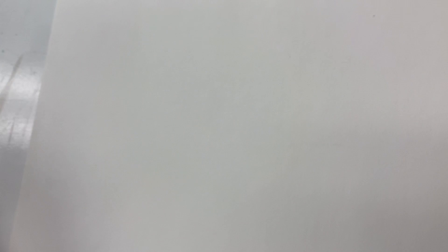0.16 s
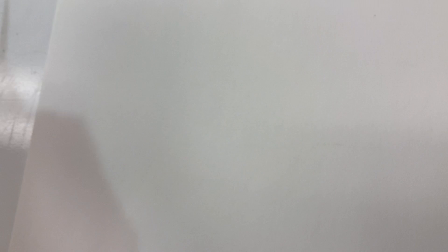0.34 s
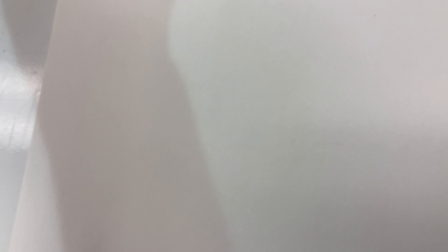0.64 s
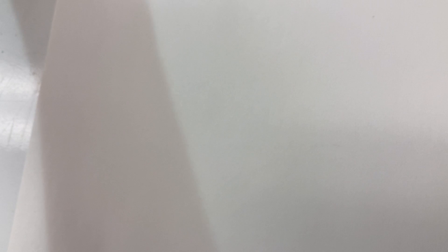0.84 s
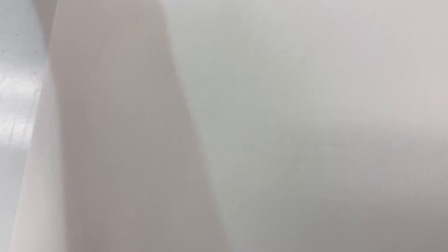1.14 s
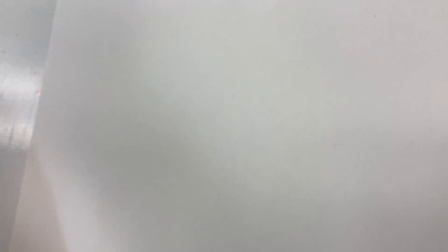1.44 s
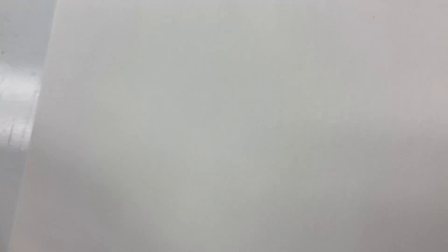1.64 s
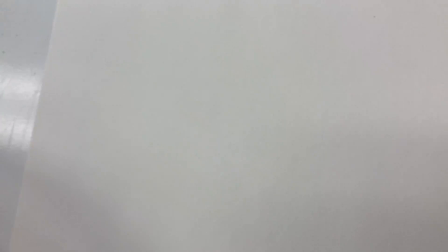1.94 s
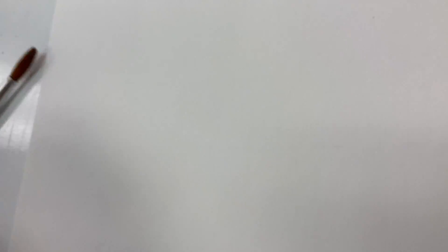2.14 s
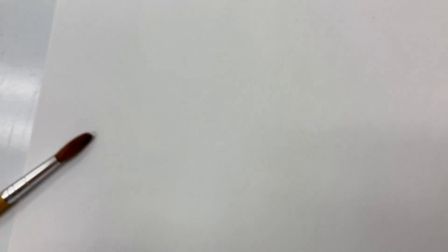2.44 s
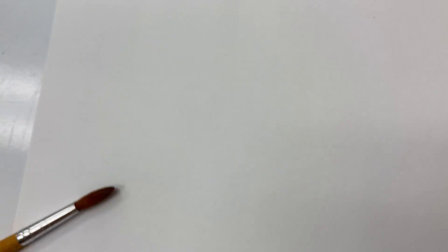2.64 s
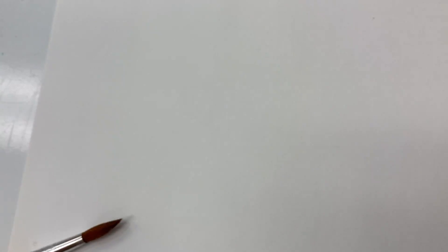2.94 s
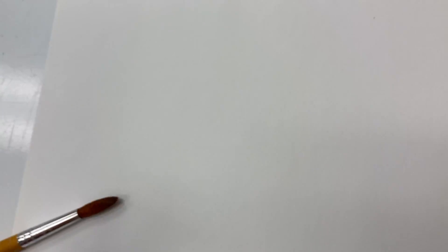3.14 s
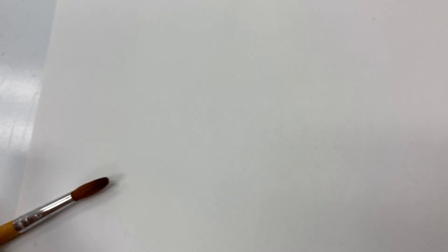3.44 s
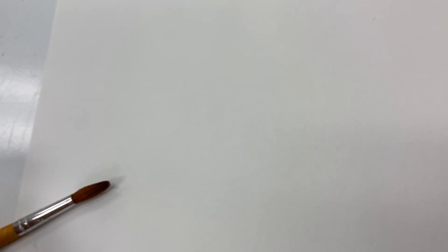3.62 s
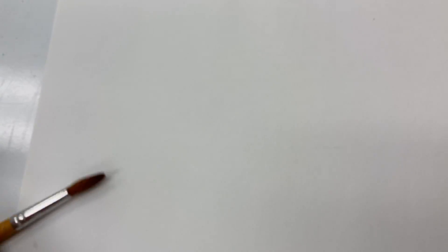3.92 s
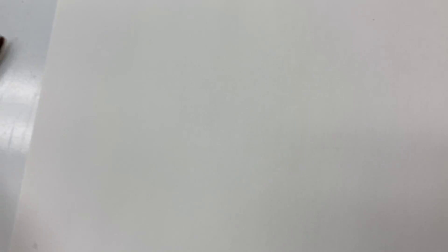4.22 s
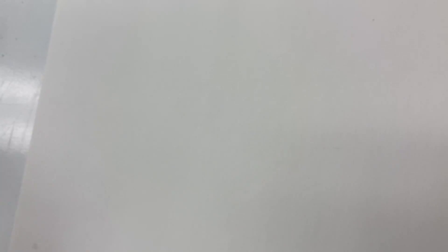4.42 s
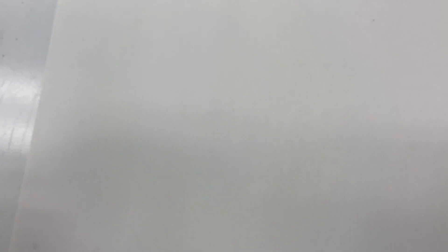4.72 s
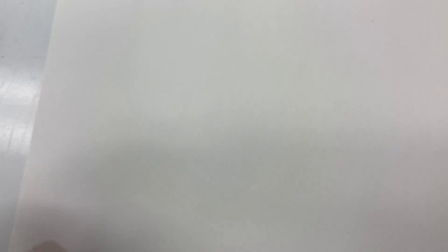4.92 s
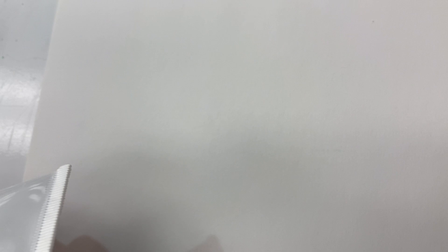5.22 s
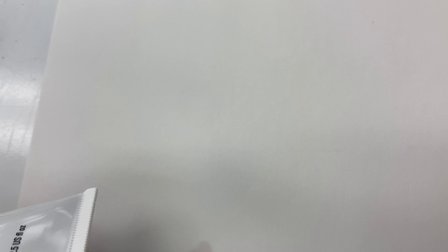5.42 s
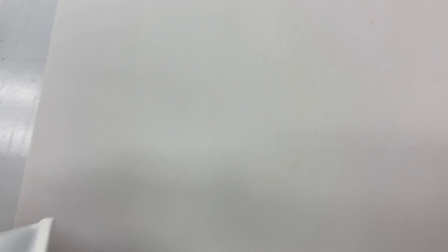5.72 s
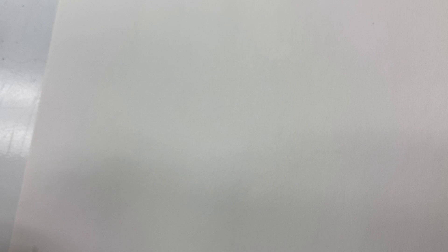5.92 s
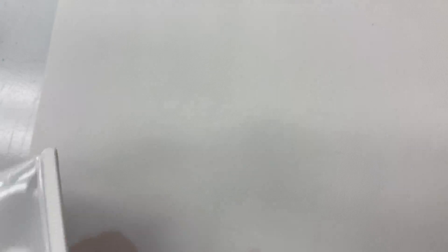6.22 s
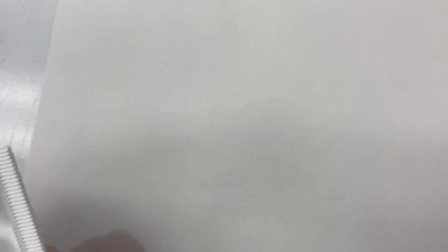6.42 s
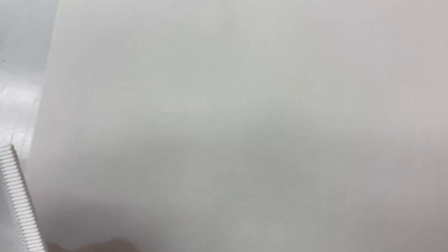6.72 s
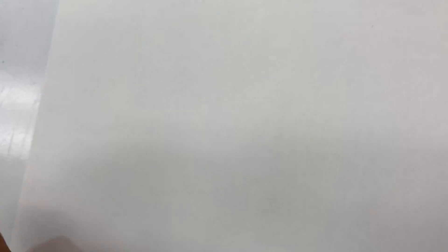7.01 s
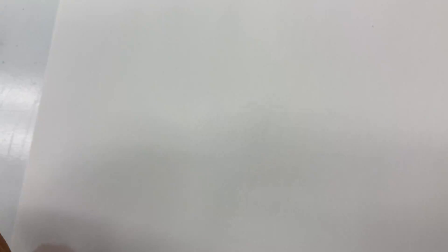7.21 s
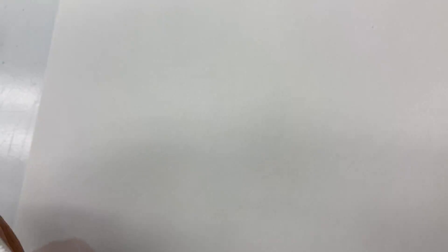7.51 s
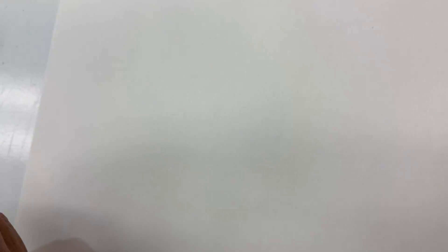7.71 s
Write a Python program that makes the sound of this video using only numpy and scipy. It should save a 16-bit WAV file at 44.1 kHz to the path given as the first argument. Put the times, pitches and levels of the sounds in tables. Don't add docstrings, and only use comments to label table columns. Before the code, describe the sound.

Close paper rustles, rubbing and small knocks on a thin board build to sharp snaps, then fade to quiet tube crinkles and ventilation hum.

```python
import sys
import numpy as np
from scipy import signal
from scipy.fft import rfft, irfft, next_fast_len
from scipy.io import wavfile
from scipy.ndimage import uniform_filter1d, map_coordinates

SR = 44100
rng = np.random.default_rng(int(sys.argv[2]) if len(sys.argv) > 2 else 0)


def pcm_store(signal):
    levels = np.round(np.clip(np.atleast_2d(signal), -1, 1) * 32767)
    wavfile.write(sys.argv[1], SR, levels.astype(np.int16).T)


def elevation(decibels):
    levels = np.asarray(decibels, float)
    return 10 ** (levels / 20)


N = 346626


def unit(x):
    return x / np.sqrt(np.mean(x ** 2) + 1e-20)


def along(points, hz):
    f, v = np.transpose(points)
    return np.interp(np.log(hz + 1), np.log(f + 1), v)


def from_grid(step_s, values):
    return np.interp(np.arange(N) / SR, np.arange(0, N / SR, step_s), values)


def wobble(rate_hz):
    knots = rng.standard_normal(int(N * rate_hz / SR) + 4)
    return map_coordinates(knots, [np.arange(N) * rate_hz / SR])


def filtered(x, response):
    n = x.shape[-1]
    m = next_fast_len(n + 2048)
    return irfft(rfft(x, m) * response(np.fft.rfftfreq(m, 1 / SR)), m)[..., :n]


def colour(points):
    return lambda hz: elevation(along(points, hz))


def resonances(modes):
    def response(f):
        total = 0
        for k, (hz, width_hz, db) in enumerate(modes):
            damping = 1j * f * width_hz
            total = total + (-1) ** k * elevation(db) * damping / (hz * hz - f * f + damping)
        return total
    return response


def spread(pair, alike):
    def mid_side(hz):
        angle = np.arccos(np.clip(along(alike, hz), -1, 1)) / 2
        return np.array([np.cos(angle), np.sin(angle)])
    mid, side = filtered(pair, mid_side)
    return np.array([mid + side, mid - side])


def grit(rate_hz, rough_db, patchy_db):
    z = signal.stft(rng.standard_normal((2, N)), nperseg=256)[2]
    field = uniform_filter1d(rng.standard_normal(z.shape[1:]), size=4, axis=0)
    field = uniform_filter1d(field, size=14, axis=1)
    pair = signal.istft(z * elevation(patchy_db * unit(field)), nperseg=256)[1][:, :N]
    return pair * elevation(rough_db * wobble(rate_hz))


def settle(t, start_s, db, t60_s):
    return elevation(db - 60 * np.abs(t - start_s) / t60_s) * (t >= start_s)


def swell(t, start_s, top_s, end_s, db):
    rise_fall = np.interp(t, [start_s, top_s, end_s], [0, 1, 0])
    return elevation(db) * np.sin(np.pi / 2 * rise_fall) ** 1.6


# start_s, level_db, t60_s, scrape_over_rumble_db
SKIDS = [(0.113, -52.5, 0.38, 2), (1.118, -57.5, 0.41, -6.5), (1.278, -64, 0.56, 7),
         (1.819, -43, 0.28, -23), (3.486, -42, 0.77, -7), (3.715, -40.5, 0.33, -11), (3.777, -34, 0.21, -2),
         (4.31, -38.5, 0.1, 2), (4.32, -46, 0.64, 0), (4.494, -53, 0.21, 2.5), (4.54, -64, 0.26, -7),
         (5.333, -81, 1, 0), (5.691, -60, 0.2, -10)]
# start_s, hardest_s, end_s, level_db, scrape_over_rumble_db
DRAGS = [(-.15, .0, 0.22, -48.5, -2), (0.174, 0.253, 0.39, -66, -1.5), (0.318, 0.372, 0.47, -69, 11),
         (1.27, 1.48, 1.707, -63.5, -1), (1.922, 2.052, 2.33, -52, -4), (2.15, 2.18, 2.306, -47.5, -2),
         (2.25, 2.44, 2.746, -51, -7.5), (2.602, 2.68, 2.9, -64, -5), (2.73, 2.948, 3.18, -73, -2),
         (3.778, 3.87, 4.25, -57, -8), (4.074, 4.138, 4.7, -60.5, -10), (4.4, 4.557, 4.68, -64.5, -0.5),
         (4.142, 4.29, 4.49, -52.5, 1.5), (5.002, 5.023, 5.1, -84, -8), (5.882, 5.93, 5.99, -69, -1),
         (6.12, 6.172, 6.22, -82, -20), (7.193, 7.27, 7.65, -76, -19), (7.46, 7.5, 7.55, -74, -13)]


def board_gains():
    t = np.arange(0, N / SR, .001)
    rumble, scrape = np.zeros((2, len(t)))
    for start_s, db, t60_s, scrape_db in SKIDS:
        rumble += settle(t, start_s, db, t60_s)
        scrape += settle(t, start_s, db + scrape_db, t60_s / 1.9)
    for start_s, top_s, end_s, db, scrape_db in DRAGS:
        push = swell(t, start_s, top_s, end_s, db)
        rumble += push
        scrape += push * elevation(scrape_db)
    return [from_grid(.001, g) for g in (rumble, scrape)]


# start_s, hiss_db, t60_s, rustle_over_hiss_db, airy_over_hiss_db
FLICKS = [(.1, -47, 0.12, -20, -1.5), (.152, -54, 0.12, -9.5, 1), (1.119, -57.5, 0.05, -2, -12),
          (1.278, -66, .25, -11.5, -25), (2.156, -53, .06, 6.5, -3.5), (2.175, -80, 0.33, 24, -13),
          (2.258, -64, 0.14, 5.5, -10), (2.614, -50, 0.26, -14, -0.5), (2.69, -68.5, 0.3, 6.5, -19),
          (3.486, -52.5, 0.31, -1, -1), (3.715, -58, 0.39, -9, -5), (3.7746, -28, .05, -4.5, 0),
          (3.785, -48.5, 0.26, 6, -6.5), (4.27, -48, .04, -15, 2), (4.307, -37, 0.11, 2, -8),
          (4.34, -50, 0.67, 0, -14.5), (4.487, -53.5, 0.28, -4, -2), (4.54, -89, 0.38, 1.5, -13),
          (5.333, -76, 0.97, 0, -1), (5.392, -64, .06, -3, -3), (5.51, -68, .1, -3, -1),
          (5.69, -71, 0.4, 0, -1), (6.165, -91, 0.31, 8, 7.5)]
# start_s, fastest_s, end_s, hiss_db, brightness_db
SLIDES = [(-.1, 0.07, 0.17, -60.5, -1.5), (-.1, .03, 0.28, -77.5, -14), (0.085, 0.11, 0.122, -48, -2),
          (.18, 0.217, 0.43, -75.5, -3), (0.335, 0.36, 0.46, -68.5, -3.5), (1.29, 1.453, 1.6, -70, -10.5),
          (1.815, 1.836, 1.98, -65.5, -7.5), (1.983, 1.993, 2.03, -58, 6), (1.985, 2.035, 2.062, -52, 7),
          (2.06, 2.12, 2.16, -72, -3), (1.877, 2.035, 2.123, -59.5, -9), (2.71, 2.76, 2.8, -72, -4),
          (2.96, 3.01, 3.24, -85, -6), (3.053, 3.143, 3.2, -84, 12.5), (3.794, 3.897, 4.3, -66.5, -7),
          (4.11, 4.128, 4.4, -63.5, -6), (4.5, 4.58, 4.68, -72, -7.5), (4.2, 4.251, 4.3, -67.5, -14),
          (5.062, 5.132, 5.16, -77.5, 3), (5.201, 5.284, 5.9, -85, -5), (5.9, 5.946, 6.0, -86, 12),
          (6.001, 6.072, 6.12, -93, -14), (7.189, 7.247, 7.29, -84, -7.5), (7.46, 7.503, 7.57, -85, 0)]


def sheet_gains():
    t = np.arange(0, N / SR, .001)
    rustle, hiss, airy = np.zeros((3, len(t)))
    for start_s, db, t60_s, rustle_db, airy_db in FLICKS:
        rustle += settle(t, start_s, db + rustle_db, t60_s / 0.98)
        hiss += settle(t, start_s, db, t60_s)
        airy += settle(t, start_s, db + airy_db, t60_s / 1.2)
    for start_s, top_s, end_s, db, bright_db in SLIDES:
        slide = swell(t, start_s, top_s, end_s, db)
        rustle += slide * elevation(-7 - 0.96 * bright_db)
        hiss += slide
        airy += slide * elevation(bright_db)
    return [from_grid(.001, g) for g in (rustle, hiss, airy)]


# centre_hz, width_hz, level_db
RUBBED_MODES = [(230, 22, 3.5), (299.2, 120, -7.5), (394.1, 31, 2), (555, 160, -10.5)]
# centre_hz, width_hz, level_db
SCRAPED_MODES = [(621.6, 90, -5.5), (830, 220, -2), (1158, 77, 2), (1420, 60, -1.5), (1603, 50, -1.5),
                 (1878, 40, -1), (2139, 31, -2), (2694, 370, -14)]
# pitch_hz, density_db_per_hz
RUSTLE_BAND = [(1900, -18.5), (2400, -1), (3500, 0.5), (4300, -8), (5500, -12), (6500, -24.5)]
HISS_BAND = [(4000, -21.5), (5500, -3), (7000, -5), (8000, -0.5), (10000, -1.5), (11500, -25.5)]
AIRY_BAND = [(9500, -21), (11000, 4), (13000, -5), (15300, -4.5), (16200, -25.5)]


def strokes(rumble_gain, scrape_gain):
    rustle_gain, hiss_gain, airy_gain = sheet_gains()

    def scraped(hz):
        return resonances(SCRAPED_MODES)(hz) ** 1.1 / (1 + (hz / 3200) ** 4)

    rumble = unit(filtered(grit(40, rough_db=0.7, patchy_db=2.0), resonances(RUBBED_MODES)))
    scrape = unit(filtered(grit(70, rough_db=3.0, patchy_db=1.0), scraped))
    rustle = unit(filtered(grit(150, rough_db=0.5, patchy_db=3.0), colour(RUSTLE_BAND)))
    fine = grit(300, rough_db=1.5, patchy_db=3.0)
    hiss = unit(filtered(fine, colour(HISS_BAND)))
    airy = unit(filtered(fine, colour(AIRY_BAND)))
    board = rumble_gain * rumble + scrape_gain * scrape
    return board + rustle_gain * rustle + hiss_gain * hiss + airy_gain * airy


# centre_hz, width_hz, level_db
KNOCKED_MODES = [(135, 15, -11.5), (228, 20, -4.5), (282.5, 32, -2), (420, 30, -5.5), (609, 17, -7),
                 (825, 68, -5), (1048, 64, -5.5)]
# centre_hz, width_hz, level_db
TAPPED_MODES = [(706, 160, -7), (1190, 180, -1), (1530, 250, -1.5), (2145, 340, -4)]


def contact(out, start_s, db, knock_db, body_db, snap_hz, top_db,
            snap_t60_s=.019, body_t60_s=.069, dull_hz=np.inf):
    t = np.arange(SR // 6) / SR
    snap_noise, body_noise, ragged, top_noise = rng.standard_normal((4, 2, len(t)))

    rise = 1 - np.exp(-t * snap_hz / 1.9)
    snap_modes = [(snap_hz, 0.14 * snap_hz, 0), (1.7 * snap_hz, 1.3 * snap_hz, -9)]
    snap = filtered(snap_noise * elevation(-60 * t / snap_t60_s) * rise, resonances(snap_modes))

    top_modes = resonances([(11600, 2200, 0), (14200, 2500, -3)])
    top = filtered(top_noise * elevation(-60 * t / 0.0024), lambda f: top_modes(f) ** 2)

    body = filtered(body_noise * elevation(-60 * t / body_t60_s),
                    lambda f: resonances(TAPPED_MODES)(f) / (1 + 1j * f / dull_hz) ** 3)

    blow = (1 + 0.41 * ragged) * t * elevation(-60 * t / 0.0089)
    knock = filtered(blow, resonances(KNOCKED_MODES))

    start = round(start_s * SR)
    layers = [(-5.0, snap), (top_db + 0.5, top), (body_db + 1.0, body), (knock_db - 0.5, knock)]
    for layer_db, layer in layers:
        out[:, start:start + len(t)] += elevation(db + layer_db) * layer / np.abs(layer[0]).max()


# start_s, peak_db, knock_db, body_db, snap_hz
TAPS = [(.096, -24.5, -19, -6, 3050), (1.1195, -39, -22.5, -10, 3510), (1.278, -39.5, -4.5, -17, 3630),
        (1.654, -60, -6, -12, 2900), (1.82, -40, 0.5, -5.5, 3660), (2.077, -36.5, -7.5, -7.5, 2720),
        (2.156, -45, -32, 6.5, 3140), (2.259, -55, 2.5, 6.5, 3400), (2.689, -40.5, -20, -4.5, 2300),
        (3.799, -28, -9.5, -12, 3817), (4.211, -52, 0, -9.5, 2920), (4.237, -38, -10.5, -15.5, 3000),
        (4.304, -17.5, -21, -9.5, 4192), (4.3077, -12.5, -25, -17, 4210), (4.312, -18.5, -26, -12, 4390),
        (4.489, -27.5, -17.5, -16.5, 4194), (5.733, -43.5, -8.5, -15, 2700), (5.77, -48, -13, -13, 3500),
        (5.847, -60, -10, -20, 6500), (6.165, -48, -33.5, -20, 2900)]


def taps(out):
    for start_s, db, knock_db, body_db, snap_hz in TAPS:
        contact(out, start_s, db, knock_db, body_db, snap_hz, top_db=-20.5)


# start_s, peak_db, knock_db, body_db
THUDS = [(.754, -65.5, 9, -13), (1.833, -38, -10, -15.5), (1.91, -52, 4.5, -0.5), (3.484, -37, 9.5, 4),
         (3.715, -42, 9, 0), (3.74, -48, 2.5, -0.5), (4.087, -59.5, 10.5, -6), (4.121, -51.5, 15.5, 5.5),
         (4.142, -48.5, 3.5, -9), (5.692, -52, 12, -3), (7.805, -70, 2.5, -11)]


def thuds(out):
    for start_s, db, knock_db, body_db in THUDS:
        contact(out, start_s, db, knock_db, body_db, snap_hz=3070, top_db=-11,
                body_t60_s=0.21, dull_hz=900)


# start_s, peak_db, knock_db, top_db
CREASES = [(.014, -42, -25.5, -6), (.068, -43.5, -29.5, -12), (.155, -37, -6, -10),
           (2.15, -47.5, -30.5, -2), (2.171, -52, -30.5, -4), (2.217, -54, -28.5, -9),
           (2.273, -57, -30, -4), (2.284, -48.5, -30, -7), (1.2, -48, -22, -22), (1.3, -49, -29, -8),
           (1.471, -51, -29, -6), (1.503, -48, -29, -8), (1.988, -36, -39, -17), (2.615, -34.5, -33, 1),
           (2.641, -39.5, -26, -9), (2.69, -40, -10, -18), (2.825, -57, -8.5, -3), (2.842, -50, -18, -9),
           (3.502, -33.5, 1.5, -8), (3.7726, -10, -36, -9), (4.272, -28, -20, -8.5),
           (5.082, -51, -10, -19.5), (7.252, -57.5, 1, -18), (7.534, -59, -14, 2), (7.56, -66, -14, -1)]


def creases(out):
    for start_s, db, knock_db, top_db in CREASES:
        contact(out, start_s, db, knock_db, body_db=-20, snap_hz=7740, top_db=top_db)


# start_s, peak_db, top_db
CRINKLES = [(.342, -56, -9), (5.333, -38, -14), (5.354, -48, -10), (5.362, -37, -10), (5.384, -37, -7),
            (5.442, -50, -15), (5.475, -38.5, -10), (5.5, -39, -6), (5.59, -50, -7), (5.597, -54, -7),
            (5.72, -57, -8), (5.754, -52, -10), (5.918, -62, -5)]


def crinkles(out):
    for start_s, db, top_db in CRINKLES:
        contact(out, start_s, db, knock_db=-43, body_db=-19, snap_hz=5200, top_db=top_db, snap_t60_s=.014)


def contacts():
    out = np.zeros((2, N + SR))
    for source in (taps, thuds, creases, crinkles):
        source(out)
    return out[:, :N]


# start_s, pitch_hz,
# level_db, t60_s
RINGS = [(0.068, 301, -32.5, .03), (0.083, 231, -37.5, 0.11), (.096, 1470, -32.5, .04),
         (.096, 3120, -32.5, 0.023), (.153, 228, -41, 0.13), (1.118, 1130, -46, 0.054),
         (1.201, 3750, -63, .025), (1.201, 1250, -58, 0.055), (1.279, 1165, -45.5, 0.054),
         (1.278, 3660, -52, .02), (1.299, 3660, -52, .03), (1.336, 3600, -57, 0.025),
         (1.503, 4700, -56, .015), (1.821, 222, -33, 0.08), (1.834, 223.5, -33, 0.1),
         (2.077, 2070, -48, .04), (3.486, 264.4, -25, 0.12), (3.484, 131, -37.5, 0.2),
         (3.49, 786, -45, .15), (3.485, 1155, -44, .1), (3.485, 656, -43.5, 0.19), (3.509, 263.8, -30, .4),
         (3.503, 440, -46, .15), (3.716, 272, -33, 0.11), (3.715, 714, -41.5, 0.13),
         (3.74, 266, -40.5, 0.23), (3.7729, 7350, -22, .018), (3.773, 3790, -31, .05),
         (3.773, 2110, -35.5, 0.12), (3.775, 5750, -35, 0.03), (3.773, 1177, -36.5, 0.035),
         (3.772, 428, -36.5, 0.3), (3.797, 266.4, -35, 0.39), (3.797, 643.7, -39.5, 0.14),
         (4.121, 267, -32, 0.1), (4.12, 130, -45, 0.37), (4.121, 650, -44.5, 0.083), (4.144, 271, -35, 0.2),
         (4.306, 1120, -31, .1), (4.305, 1440, -37, 0.059), (4.305, 3600, -29, 0.072),
         (4.306, 4250, -24, 0.045), (4.304, 5500, -30, 0.064), (4.305, 420, -36, 0.1),
         (5.082, 8620, -53.5, 0.022), (5.362, 250, -51, .15), (5.734, 2765, -58, .012),
         (5.734, 653, -58, 0.048), (5.754, 751, -52, 0.031), (5.771, 3280, -64, .03),
         (3.7727, 7720, -11, .008),
    (3.7727, 11560, -9, .009),
    (3.7727, 9700, -10, .008),
    (3.7727, 14300, -18, .005),
    (3.7767, 11500, -20, .014),
    (3.7767, 8000, -24, .015),
    (4.305, 334, -32, .1),
    (4.123, 390, -42, .06),
    (4.123, 463, -46, .1),
]


def rings():
    out = np.zeros((2, N + SR))
    t = np.arange(SR // 3) / SR
    for start_s, hz, db, t60_s in RINGS:
        knots = rng.standard_normal(300)
        beats = t * (50.3 + .09 * hz)
        beat_db = 4 * np.interp(beats, np.arange(knots.size), knots) * np.minimum(beats / 2, 1)
        rise = 1 - np.exp(-t * hz / 0.69)
        cycles = hz * t + np.array([[0], [rng.random()]])
        start = round(start_s * SR)
        level = elevation(db + beat_db - 60 * t / t60_s)
        out[:, start:start + len(t)] += level * rise * np.sin(2 * np.pi * cycles)
    return out[:, :N]


# start_s, end_s, pitch_hz, width_hz, level_db
SQUEAKS = [(0.55, .7, 2510, 260, -77), (0.28, 0.425, 2820, 220, -72), (0.32, 0.419, 4860, 1100, -66.5),
           (1.33, 1.52, 3720, 420, -61.5), (1.37, 1.57, 1220, 240, -61), (1.4, 1.53, 1920, 240, -64),
           (0, .06, 1150, 95, -52.5), (.24, .27, 1170, 180, -62), (.33, 0.47, 1120, 240, -71),
           (2.16, 2.52, 404, 18.3, -53.5), (2.16, 2.35, 231, 22.4, -53.5), (2.17, 2.34, 1590, 60, -58),
           (2.17, 2.36, 1870, 60, -61), (2.4, 2.56, 1850, 50, -59.5), (2.4, 2.48, 1600, 46, -62),
           (2.6, 2.675, 1150, 110, -61.5), (2.55, 2.73, 440, 89, -60.5), (1.845, 1.87, 1150, 120, -61),
           (1.898, 1.932, 1135, 120, -58.5), (5.33, 5.4, 1400, 400, -72.5), (1.898, 1.93, 3050, 500, -57),
           (1.905, 1.945, 3740, 450, -59.5), (3.581, 3.658, 2960, 500, -66), (3.8, 3.9, 3750, 164, -59.5),
           (4.302, 4.335, 4300, 1200, -37.5), (3.944, 4.022, 1870, 160, -59.5),
           (4.205, 4.29, 1610, 70, -48), (4.236, 4.3, 3100, 800, -53), (4.478, 4.53, 1270, 230, -46),
           (5.01, 5.42, 3200, 440, -83), (2.16, 2.55, 700, 270, -59.5), (5.01, 5.06, 2200, 560, -77),
           (5.323, 5.423, 5270, 1100, -69.5), (1.975, 2.055, 1150, 90, -51), (2.371, 2.58, 1160, 70, -54),
           (4.476, 4.525, 4370, 600, -48), (7.224, 7.272, 1920, 490, -73.5), (6.42, 6.48, 2000, 400, -83),
           (6.04, 6.1, 3000, 510, -81), (2.4, 2.55, 2840, 500, -71), (7.64, 7.728, 3980, 200, -89)]


def squeaks():
    out = np.zeros((2, N))
    for start_s, end_s, hz, width_hz, db in SQUEAKS:
        a, b = round(start_s * SR), round(end_s * SR)
        mode = resonances([(hz, width_hz, 0)])
        tone = filtered(rng.standard_normal((2, b - a)), lambda f: mode(f) ** 1.7)
        out[:, a:b] += elevation(db) * unit(tone) * signal.windows.tukey(b - a, .6)
    return out * elevation(2.0 * wobble(45))


# pitch_hz, t60_s
ROOM_DECAY = [(200, 0.1), (2000, 0.41), (10000, 0.062)]


def room(x):
    hz, t, z = signal.stft(rng.standard_normal((2, SR // 2)), SR, nperseg=256)
    decay = elevation(-60 * t / along(ROOM_DECAY, hz)[:, None])
    tail = signal.istft(z * decay, SR, nperseg=256)[1]
    delayed = np.pad(x, ((0, 0), (200, 0)))
    return signal.fftconvolve(delayed, tail / np.linalg.norm(tail[0]), axes=1)[:, :N]


# time_s, level_db
VENT = [
    (0, -59),
    (2.8, -59.5),
    (4.3, -58.5),
    (4.9, -61.5),
    (7.1, -61.5),
    (7.86, -66),
]
# start_s, level_db
JOLTS = [
    (1.83, -55.5),
    (2.17, -70),
    (3.49, -61),
    (3.78, -45.5),
    (4.13, -53),
    (4.31, -47),
    (5.69, -54),
]
# centre_hz, width_hz, level_db
DRONE_MODES = [(134, 60, -6), (228, 34, 2.5), (320, 130, -5.5)]
# pitch_hz, density_db_per_hz
AIR_BAND = [(300, -11), (500, -3), (900, -8), (2000, -12.5), (4000, -18.5), (8000, -20.5), (15200, -22),
            (15600, -45.5)]
# pitch_hz, likeness_0_to_1
AIR_ALIKE = [(40, 0.84), (250, 1), (600, 0.23), (5500, 0.23), (7500, .92), (16000, .93)]


def air(board_gain):
    vent = elevation(np.interp(np.arange(N) / SR, *np.transpose(VENT))) * elevation(1.6 * wobble(3))
    pressed = uniform_filter1d(board_gain, size=SR // 10)
    t = np.arange(0, N / SR, .02)
    rocking = from_grid(.02, sum(settle(t, start_s, db, t60_s=0.71) for start_s, db in JOLTS))

    def deep_band(hz):
        return resonances([(53, 34, 0)])(hz) ** 2 / (1 + (36 / (hz + 1)) ** 4)

    def drone_band(hz):
        return resonances(DRONE_MODES)(hz) / (1 + (hz / 550) ** 4)

    def duct_band(hz):
        return resonances([(1070, 160, -2), (1260, 220, 0)])(hz) ** 1.5

    deep = (vent + rocking) * unit(filtered(rng.standard_normal((2, N)), deep_band))
    drone = unit(filtered(grit(5.9, rough_db=2.5, patchy_db=1.0), drone_band))
    drone = (elevation(-5.5) * vent + elevation(-10.5) * pressed) * drone
    duct = elevation(-82 + 2.5 * wobble(3.6)) * unit(filtered(rng.standard_normal((2, N)), duct_band))
    steady = elevation(-78.0) * unit(filtered(rng.standard_normal((2, N)), colour(AIR_BAND)))
    return spread(deep + drone + duct + steady, AIR_ALIKE)


# pitch_hz, likeness_0_to_1
NEAR_ALIKE = [(250, 1), (600, 0.93), (1500, 0.31), (3000, 0.35), (5500, 0.41), (7500, 0.997), (16000, 1)]


def scene():
    rumble_gain, scrape_gain = board_gains()
    hits, tones = contacts(), rings()
    answer = elevation(-10.5) * room(hits + 0.6 * tones)
    table = strokes(rumble_gain, scrape_gain) + squeaks() + hits + tones + answer
    return spread(table, NEAR_ALIKE) + air(rumble_gain)


# pitch_hz, left_minus_right_db
SIDES = [(50, 3), (150, 1.5), (700, -2), (2500, -2), (6000, -0.5)]
# pitch_hz, right_lead_rad
TURN = [(0, 0), (125, .2), (300, .6), (700, 1.6), (1300, 2.9), (2500, 4.3), (4200, 6.2),
        (8050, 0), (14700, -4 * np.pi), (18025, -6 * np.pi)]


def microphones(dry):
    def sides(hz):
        phase_rad = np.interp(hz, *np.transpose(TURN))
        left = elevation(along(SIDES, hz) / 2) * np.exp(-.5j * phase_rad)
        return np.array([left, 1 / left]) / (1 + (hz / 15800) ** 70)
    return filtered(dry, sides)


def band_limit(x):
    return signal.sosfilt(signal.butter(12, 16550, fs=SR, output="sos"), x)


def record(dry):
    mix = microphones(dry)
    return band_limit(mix)


dry = scene()
out = record(dry)
pcm_store(out)
```